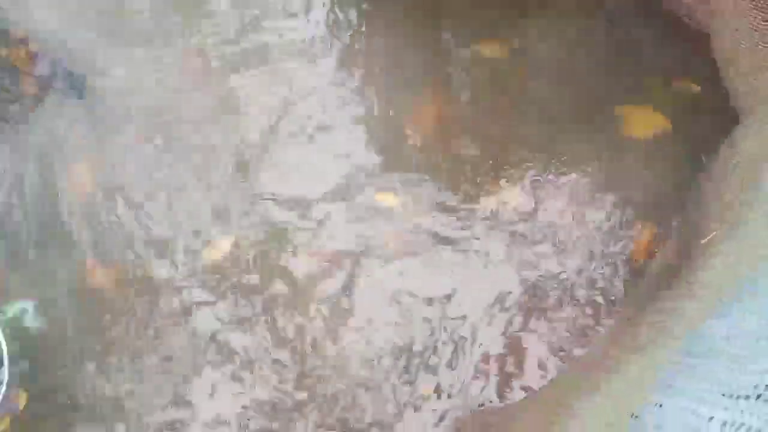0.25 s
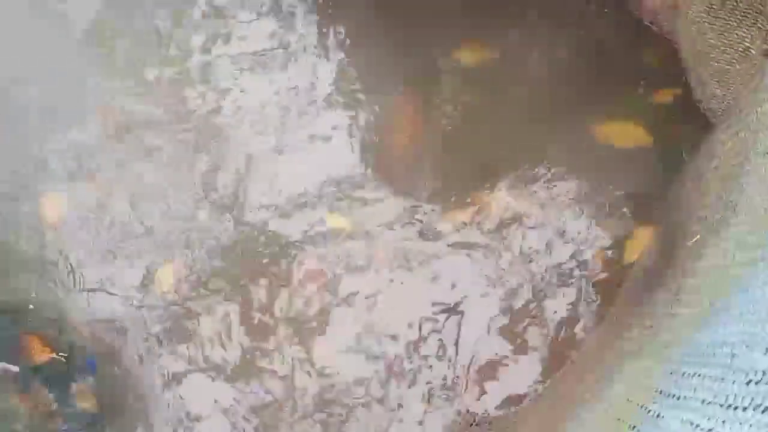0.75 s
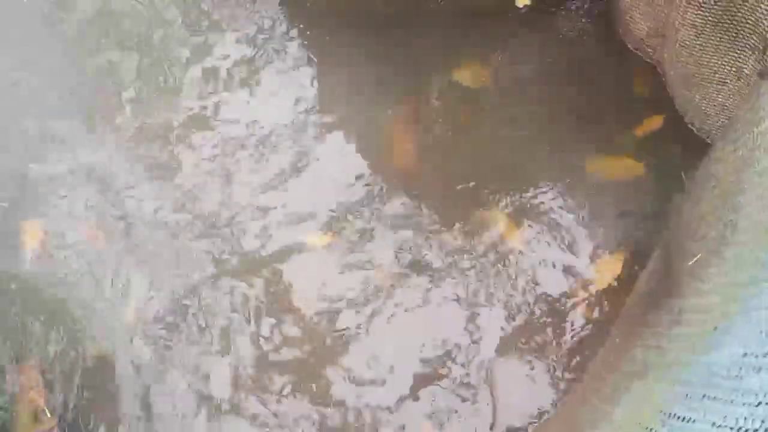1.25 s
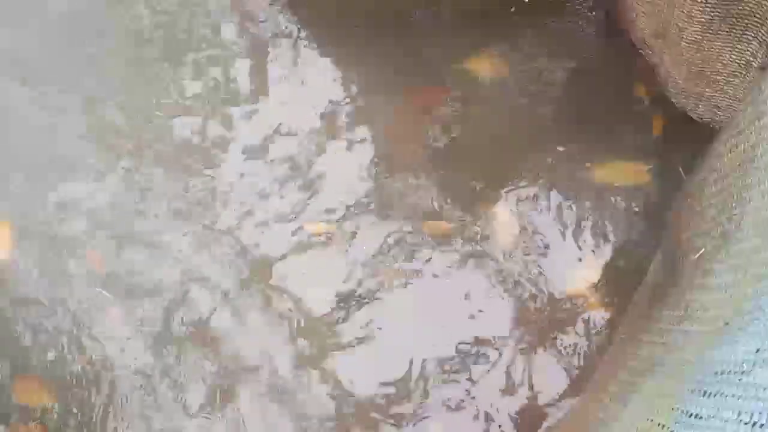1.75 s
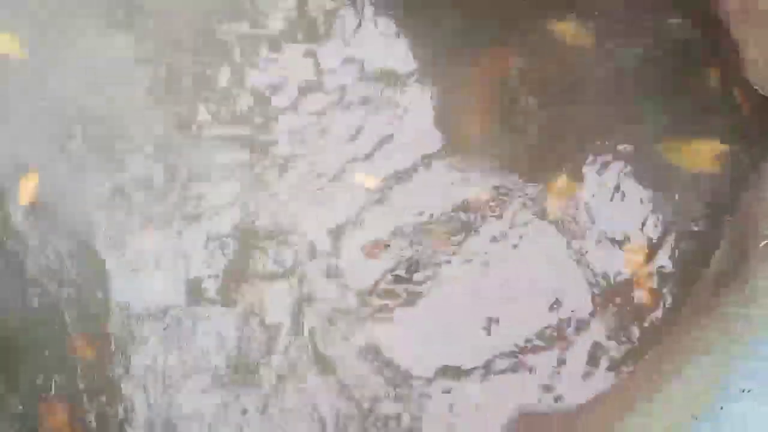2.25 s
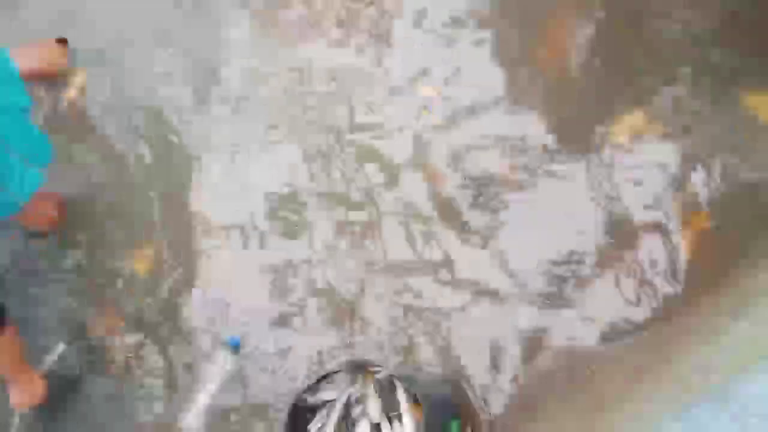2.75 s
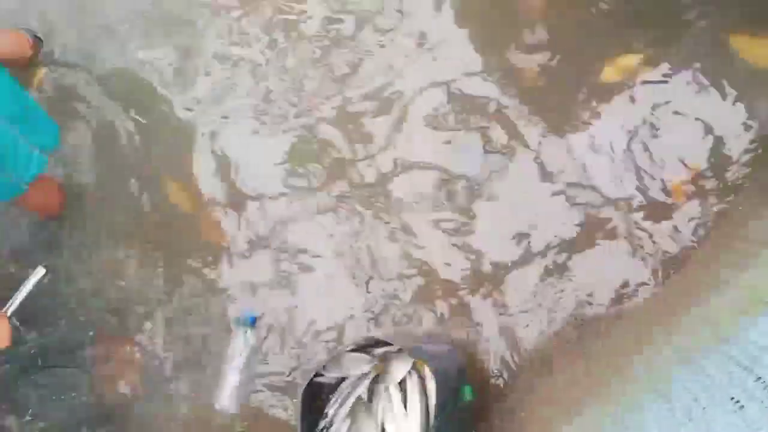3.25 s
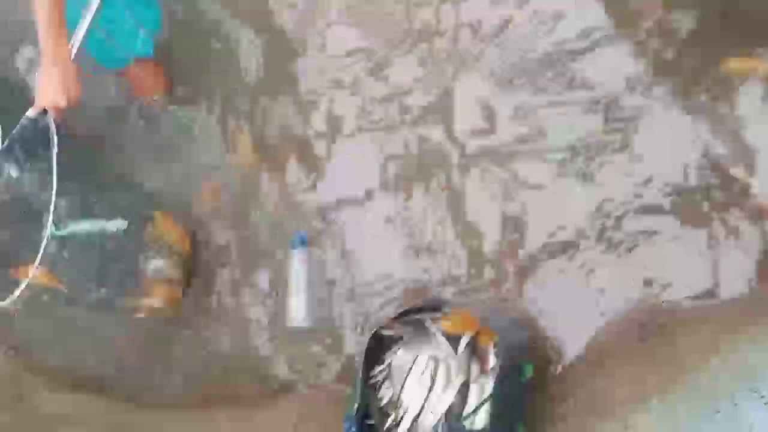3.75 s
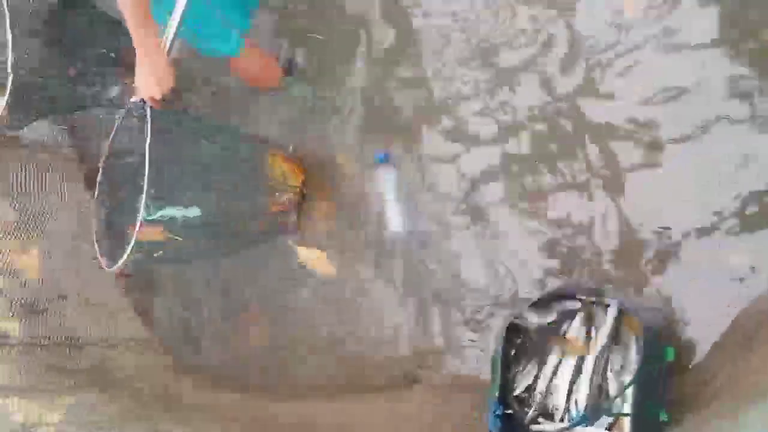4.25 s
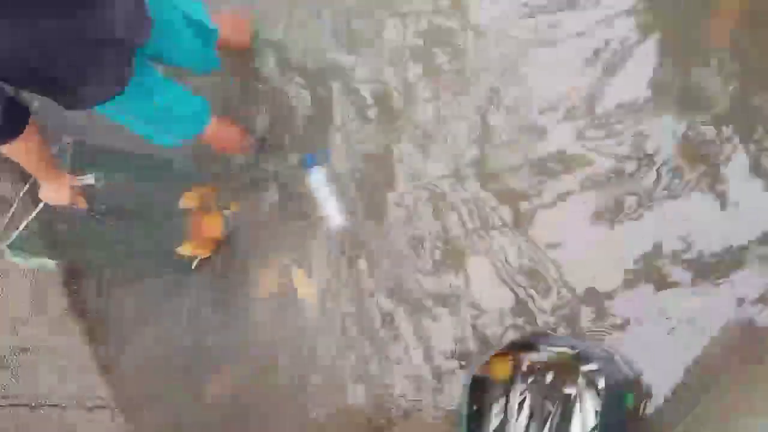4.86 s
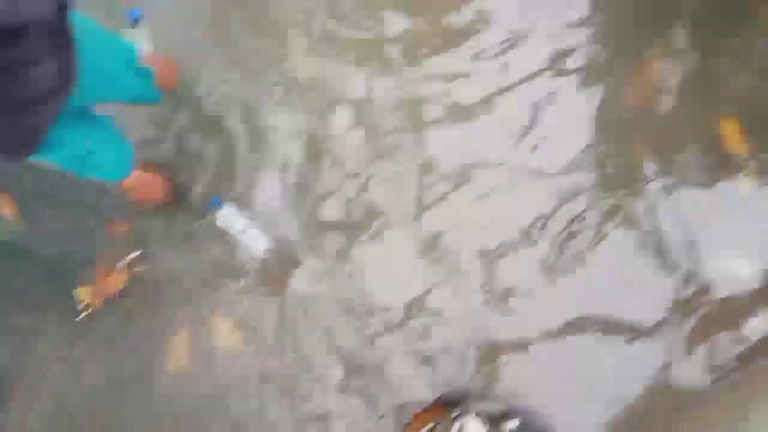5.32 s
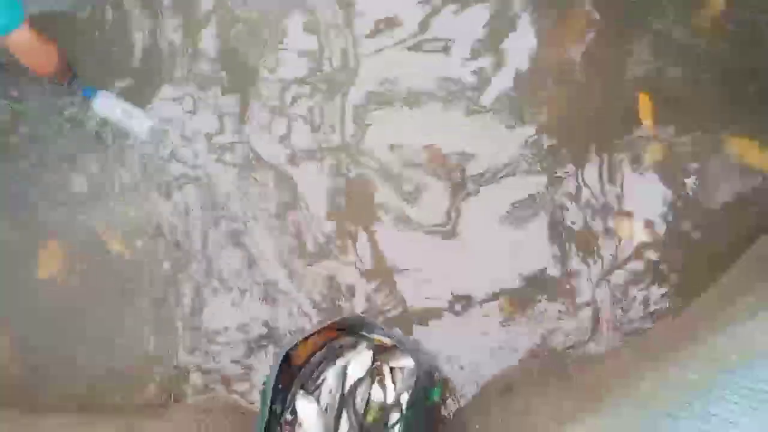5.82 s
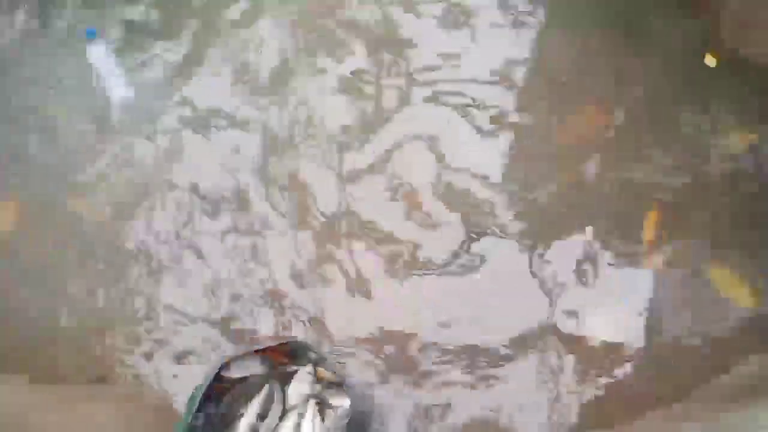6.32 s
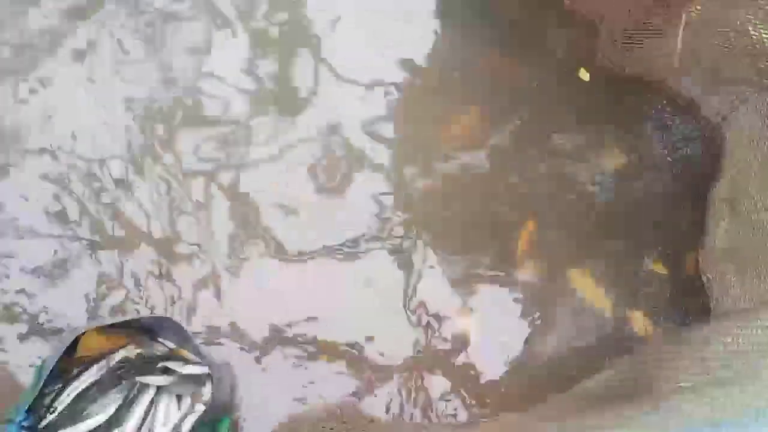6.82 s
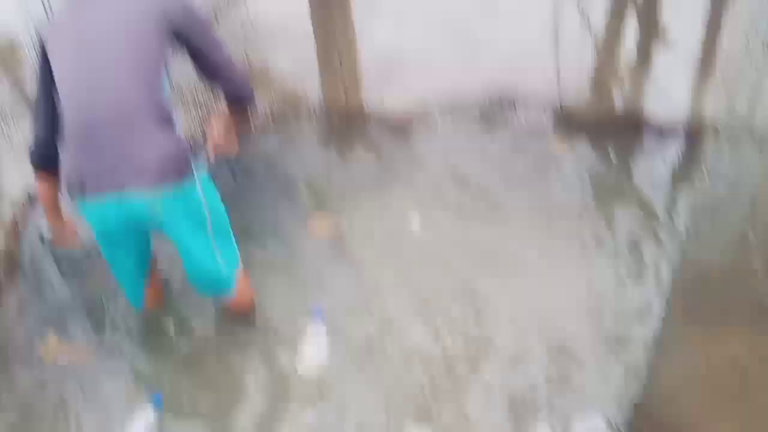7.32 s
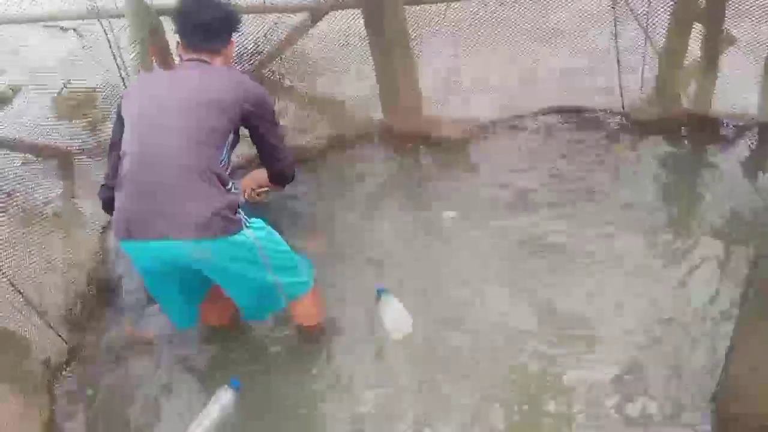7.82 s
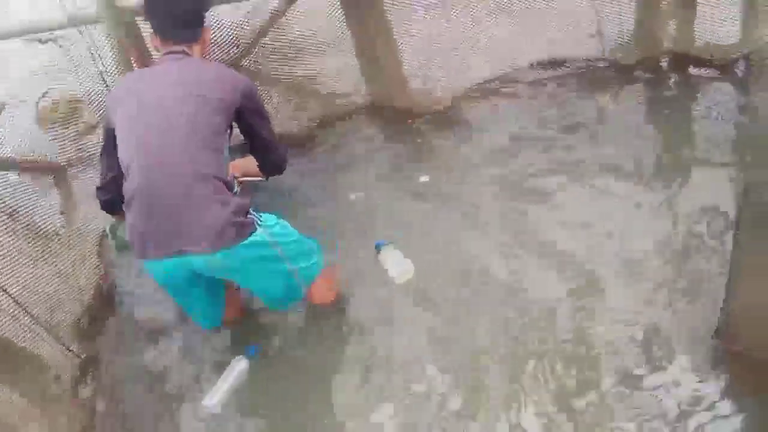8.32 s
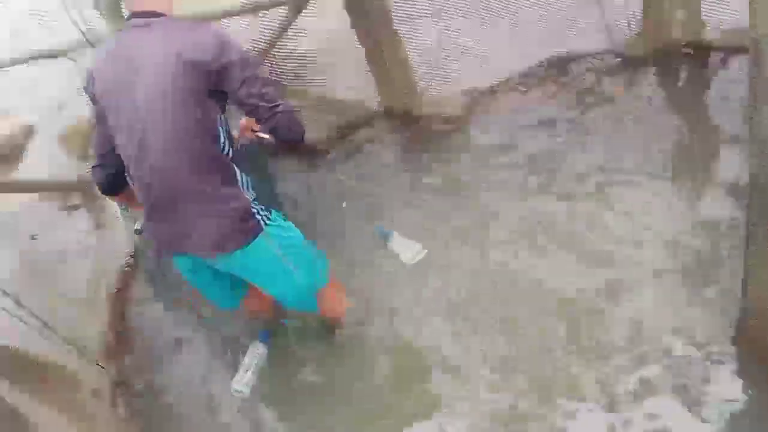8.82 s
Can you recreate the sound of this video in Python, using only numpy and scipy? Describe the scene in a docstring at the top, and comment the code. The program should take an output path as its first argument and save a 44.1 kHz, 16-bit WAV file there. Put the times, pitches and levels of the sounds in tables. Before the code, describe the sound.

Irregular low hollow knocks and wet smacks of a flapping catch, crisp spray ticks, soft sloshing and dripping in shallow water outdoors.

```python
"""Shallow water outdoors: fish are scooped with a hand net from a trap.
Close by, the catch flaps in a plastic bucket: decaying low tones knock on its wall, and bursts of
coloured noise make the wet slaps and sharp flicks of spray. Behind, the net and wading legs stir the water:
patters of noise and tiny rings slosh, splash and drain. Short rings add gulps of air and higher bucket
knocks. Quiet air lies under it all."""
import sys
import numpy as np
from scipy import signal
from scipy.fft import rfft, irfft, next_fast_len
from scipy.io import wavfile
from scipy.ndimage import uniform_filter1d, map_coordinates

SR = 44100
rng = np.random.default_rng(int(sys.argv[2]) if len(sys.argv) > 2 else 0)


def generate_wav(sig):
    """Save sig (samples, or channels by samples) to the path in sys.argv[1] as 16-bit PCM at SR."""
    pcm = np.round(np.clip(np.atleast_2d(sig).T, -1, 1) * 32767).astype(np.int16)
    wavfile.write(sys.argv[1], SR, pcm)


N = 400428  # length [samples]

# Event levels are cues for the mix: each source trims them further.
# Tail beats on the bucket wall: (time [s], level [dB], nominal pitch [Hz])
TAIL_BEATS = [(0.098, -21.5, 217), (.117, -26, 178), (0.271, -29, 249), (0.564, -31.5, 259),
              (0.623, -25, 251), (0.656, -21, 264), (0.701, -25.5, 250), (.736, -24.5, 290),
              (1.113, -23.5, 274), (1.193, -25.5, 268), (1.224, -26, 250), (1.473, -25.5, 275),
              (1.717, -32.5, 246), (1.777, -31, 242), (1.916, -24, 269), (2.419, -31, 244),
              (2.534, -21, 275.6), (2.706, -26.5, 276), (2.737, -26.5, 261), (2.806, -27, 258),
              (3.064, -28.5, 263), (3.088, -38.5, 286), (3.194, -20, 247), (3.297, -32, 243),
              (3.498, -8.5, 270.5), (3.507, -16.5, 264), (3.534, -39, 286), (3.592, -25, 258),
              (3.785, -28.5, 262), (3.811, -25, 235), (4.009, -14, 254), (4.035, -24, 303),
              (4.252, -18, 244), (4.275, -19.5, 262), (4.322, -19.5, 258), (4.355, -21.5, 257),
              (4.487, -22, 286), (4.517, -25, 295), (4.648, -11.5, 279), (4.714, -17, 272),
              (4.867, -20.5, 280), (4.912, -10.5, 252), (4.923, -18, 182), (5.433, -36, 280),
              (5.835, -51.5, 267), (6.068, -32.5, 330), (6.256, -17.5, 295), (6.336, -23, 258),
              (6.747, -16.5, 284), (6.831, -20, 284), (7.199, -18, 295), (7.205, -29, 288),
              (7.342, -13.5, 254), (7.384, -9, 263), (7.4, -9, 242), (7.636, -25.5, 260),
              (7.678, -14.5, 287), (7.777, -26, 273), (7.922, -14, 265), (8.058, -6.5, 269),
              (8.215, -14, 321), (8.272, -19.5, 239), (8.302, -19, 280), (8.367, -15, 280),
              (8.427, -15, 273), (8.68, -16, 271), (8.737, -21.5, 272), (8.762, -31, 267),
              (8.843, -27.5, 264), (8.973, -25, 284), (9.037, -24.5, 263), (9.071, -22, 282)]
# Wet slaps of fish on fish: (time [s], level [dB], spray relative to the slap [dB])
WET_SLAPS = [(0.254, -36.5, -32), (.626, -32.5, -17), (0.736, -22, -28), (1.144, -33, 9),
             (1.192, -25.5, -21), (1.4703, -21, -17), (1.792, -29.5, -15), (2.057, -20, -11),
             (2.418, -21, -5.5), (2.61, -17, -14), (2.709, -16.5, -8.5), (2.78, -23, 1), (2.536, -31.5, 6),
             (3.127, -32.5, -6), (4.004, -25, 10), (4.254, -21.5, -2), (4.647, -15, -17), (4.787, -22, -18),
             (4.867, -13, -4), (5.6292, -49, 35), (5.7373, -25.5, -2), (5.762, -34, 20), (5.855, -25, -9),
             (6.389, -36.5, -15), (6.332, -30.5, 6.5), (6.75, -36, 7), (6.836, -28, -11),
             (7.2597, -35.5, 9), (7.283, -28.5, -12), (7.371, -31, 5.5), (7.389, -31, -25),
             (7.429, -27.5, 0), (7.6385, -23, -4), (7.68, -13.5, -33), (7.9225, -20, -15),
             (8.218, -11, 0.5), (8.273, -19.5, -22), (8.3014, -24, 0.5), (8.3686, -20.5, 0),
             (8.428, -30.5, 8)]
# Flicks of spray: (time [s], level [dB])
SPRAY_FLICKS = [(0.0746, -11), (0.1229, -21.5), (.172, -24), (0.3048, -23.5), (0.482, -26), (0.61, -20.5),
                (0.676, -18.5), (0.8602, -16.5), (1.089, -22.5), (1.1456, -20.5), (1.4432, -26),
                (1.884, -28.5), (1.9138, -20), (2.3098, -17.5), (2.3664, -20), (2.487, -15), (2.648, -23),
                (2.816, -15), (2.936, -29), (3.015, -14.5), (3.1444, -21), (3.2012, -21), (3.3382, -18.5),
                (3.7666, -13), (3.8123, -17.5), (4.128, -19.5), (4.5464, -22), (4.815, -15.5), (5.477, -28),
                (5.0689, -14.5), (6.1173, -24), (6.223, -36), (6.257, -21), (6.291, -27.5), (6.406, -29.5),
                (6.835, -15), (6.9064, -19), (6.916, -15.5), (7.5379, -23), (7.7394, -19.5), (7.836, -12.5),
                (8.054, -25), (8.1201, -15.5), (8.158, -22), (8.191, -17), (8.537, -18.5), (8.9747, -17.5)]
# Short rings, gliding gulps of air and higher rings of the knocked bucket wall:
# (time [s], level [dB], starting pitch [Hz], life [s], glide over one life [octaves])
SHORT_RINGS = [(.244, -35.5, 1615, 0.019, 0.18), (.43, -40.5, 617, 0.063, 0.43),
               (1.143, -23, 3480, 0.0076, -0.087), (1.21, -30.5, 670, 0.014, 0.12),
               (2.11, -31, 667, 0.023, 0.028), (3.385, -41, 523, 0.1, 0.67), (3.442, -30, 1546, .02, -0.08),
               (3.496, -24.5, 584, 0.026, -0.14), (3.885, -34, 489, 0.042, 0.64),
               (3.922, -36, 880, 0.043, 0.22), (4.11, -41, 1400, 0.067, 0.0058),
               (4.421, -33, 849, 0.065, 0.41), (5.69, -41, 759, 0.079, -0.19),
               (5.761, -31, 900, 0.0089, .1), (5.79, -29.5, 703, 0.024, -0.15),
               (5.83, -34.5, 655, 0.027, 0), (5.965, -30.5, 4260, 0.0063, 0.23),
               (6.067, -35, 602, 0.0084, 0.35)]
# Strokes of the net and legs through the water:
# (time [s], length [s], slosh level [dB], draining drops level [dB])
WATER_STROKES = [(0.0, 0.22, -51, -48.5), (0.283, 0.094, -41.5, -38), (0.531, 0.39, -48, -47.5),
                 (0.837, 0.053, -40, -36), (0.979, 0.22, -46.5, -46), (1.411, 0.11, -45.5, -44),
                 (1.707, 0.079, -57.5, -42), (1.903, 0.17, -51, -51), (2.249, 0.53, -52.5, -49),
                 (2.701, 0.027, -38, -35.5), (2.921, 0.065, -41, -34), (3.13, 0.29, -60, -48),
                 (3.346, 0.13, -40, -41), (3.48, 0.24, -47.5, -46), (3.73, 0.19, -46, -41.5),
                 (3.938, 0.36, -40.5, -37), (4.332, 0.19, -41.5, -41.5), (4.612, 0.21, -40.5, -36),
                 (5.057, 0.054, -53, -40.5), (5.303, 0.34, -59.5, -48.5), (5.394, 0.016, -44, -35.5),
                 (5.618, 0.24, -42.5, -38), (6.176, 0.19, -57.5, -49.5), (6.739, 0.17, -50, -46.5),
                 (6.992, 0.18, -66, -56.5), (7.257, 0.11, -45.5, -46.5), (7.53, 0.1, -59.5, -45),
                 (7.718, 0.2, -45.5, -39), (8.043, 0.11, -41.5, -42.5), (8.179, 0.062, -34.5, -36),
                 (8.343, 0.24, -53, -47.5), (8.636, 0.2, -44.5, -41.5), (8.938, 0.19, -40.5, -34.5)]
# Thrown water crashing back: (time [s], length [s], level [dB])
CRASHES = [(0.331, 0.012, -39), (2.799, 0.042, -32), (4.374, 0.11, -41.5), (5.623, 0.025, -30),
           (5.721, 0.14, -33)]

# Colours set only the balance of the spectrum, since each coloured sound is rescaled.
# Low body of the bucket wall: (frequency [Hz], level [dB])
WALL_COLOUR = [(30, -17), (70, -19.5), (105, -7.5), (150, -16.5), (200, 6), (260, 10), (350, -1.5),
               (470, -41), (900, -92)]
# Higher modes of the bucket wall: (frequency [Hz], level [dB])
UPPER_WALL_COLOUR = [(300, -49), (480, -11.5), (640, 17), (800, -3), (1050, -12.5), (1400, 9), (2500, -17)]
# Wet skin clapping: (frequency [Hz], level [dB])
SLAP_COLOUR = [(200, -51), (500, -12.5), (700, 2.5), (900, -4.5), (1400, 7), (2100, 8), (3000, -1.5),
               (4000, 3.5), (5200, -16), (12000, -99)]
# Flying spray and single drops: (frequency [Hz], level [dB])
SPRAY_COLOUR = [(300, -27), (1000, -40), (2000, -13.5), (4000, -3.5), (5200, -10), (6500, -1), (7800, 6.5),
                (10000, 0), (12500, -3.5), (15000, 2.5)]
# Foam of the slosh: (frequency [Hz], level [dB])
SLOSH_COLOUR = [(60, 2), (480, -26), (700, -7), (950, -20), (1500, 13), (2200, 11.5), (2800, 8.5),
                (4000, 10.5), (5200, -2.5), (9000, -11)]
# Water running off the mesh: (frequency [Hz], level [dB])
DRAIN_COLOUR = [(1500, -33), (3500, -1.5), (5200, -9.5), (6500, -3), (7800, 5), (9500, -5.5), (12500, -5.5),
                (15000, -8.5)]
# Outdoor air: (frequency [Hz], level [dB])
AIR_COLOUR = [(25, -17), (60, 21.5), (200, 29), (500, -11), (1000, -1.5), (3000, 2.5), (5300, -33),
              (6800, 4.5), (7900, 25), (9500, -17), (15000, -37)]
# Sheet of water breaking: (frequency [Hz], level [dB])
SHEET_COLOUR = [(500, -23), (1400, 3.5), (2700, -1), (4400, -2.5), (5500, -9), (7800, -3.5), (13000, -11)]
# Small bubbles under the foam: (frequency [Hz], level [dB])
GURGLE_COLOUR = [(300, -31), (600, 1.5), (1500, 2.5), (4000, 28)]
# Stereo likeness: (frequency [Hz], left-right correlation [-1 to 1])
LIKENESS = [(200, 0.96), (500, 0.86), (1000, -0.59), (2000, 0.38), (4000, -0.012)]
# Stereo balance: (frequency [Hz], left over right [dB])
BALANCE = [(250, 1), (4500, 0.5), (8000, -6.5), (12000, -1.5)]

RISE_S = 0.023  # a stroke gathers speed
SETTLE_T60, DRAIN_T60 = 0.39, 0.36  # [s] the slosh settles and the mesh runs dry after it
LAPPING_DB, DRIPPING_DB = -101.5, -64.5  # what is left of both between strokes, before trims
UNEVEN_DB, UNEVEN_RATE = 1.5, 21.95  # the water moves unevenly: spread [dB], random points a second
TOP_HZ = 15750  # middle of the upper band edge


def amp(db):
    """Decibels to gain."""
    return 10 ** (np.asarray(db) / 20)


def unit(x):
    """Scale to rms 1."""
    return x / np.sqrt(np.mean(x ** 2) + 1e-20)


def along(points, hz):
    """Read a (frequency, value) table on a log frequency axis."""
    f, value = np.transpose(points)
    return np.interp(np.log(hz + 1), np.log(f + 1), value)


def filtered(x, response):
    """Shape the spectrum of x by a response of frequency."""
    n = x.shape[-1]
    padded = next_fast_len(n + 4096)
    spectrum = rfft(x, padded) * response(np.fft.rfftfreq(padded, 1 / SR))
    return irfft(spectrum, padded)[..., :n]


def panned(db):
    """Left and right gains for a left-right difference, at constant power."""
    gains = amp(np.array([db, -db]).reshape(2, -1) / 2)
    return gains / np.sqrt(np.mean(gains ** 2, axis=0))


def voiced(pair, colour):
    """Two unrelated signals become coloured left and right of rms 1, alike in the bass."""
    def mid_side_gains(hz):
        turn = np.arccos(np.clip(along(LIKENESS, hz), -1, 1)) / 2
        return amp(along(colour, hz)) * [np.cos(turn), np.sin(turn)]

    mid, side = filtered(pair, mid_side_gains)
    left_right = np.array([mid + side, mid - side])
    return unit(filtered(left_right, lambda hz: panned(along(BALANCE, hz))))


def noise(colour):
    """Coloured stereo noise of rms 1."""
    return voiced(rng.standard_normal((2, N)), colour)


def wet_noise(colour, patchy_db=4.8):
    """Noise with passing resonances: small cavities in the water open and close all the time."""
    z = signal.stft(rng.standard_normal((2, N)), nperseg=512)[2]
    field = rng.standard_normal(z.shape[1:])
    field = uniform_filter1d(field, size=3, axis=0)  # blurred across frequency
    field = uniform_filter1d(field, size=6)  # and across time
    patchy = signal.istft(z * amp(patchy_db * unit(field)))[1][:, :N]
    return voiced(patchy, colour)


def excited(force, colour):
    """A rough force of the given rms envelope rings a body of the given colour."""
    return np.sqrt(np.mean(force ** 2)) * voiced(force * rng.standard_normal((2, N)), colour)


def wobble(rate):
    """A smooth curve through random points, rate of them a second."""
    points = rng.standard_normal(int(N * rate / SR) + 4)
    return map_coordinates(points, [np.arange(N) * rate / SR])


def fade(t, t60):
    """Exponential decay by 60 dB in t60 seconds."""
    return np.exp(-np.log(1000) * t / t60)


def onset(t, rise_s):
    """A rise from silence towards full level, with time constant rise_s."""
    return -np.expm1(-t / rise_s)


def swell(t, peak_s):
    """A soft push that reaches 1 at peak_s and dies away."""
    return (t / peak_s * np.exp(1 - t / peak_s)) ** 2


def add(track, start_s, sound):
    """Mix a sound into a track at start_s."""
    start = max(0, round(start_s * SR))
    part = track[..., start:start + sound.shape[-1]]
    part += sound[..., :part.shape[-1]]


def patter(rate, t60):
    """Envelope of rms 1 of many tiny impacts, rate of them a second, a few much larger than the rest."""
    chance = rng.random(N)
    size = np.minimum(rng.exponential(size=N), 4)
    power = (chance < rate / SR) * size ** 2
    return unit(np.sqrt(signal.lfilter([1], [1, -fade(1 / SR, t60) ** 2], power)))


def air():
    """Quiet outdoor air is a steady coloured noise."""
    return amp(-61.5) * noise(AIR_COLOUR)


def surroundings(x, t60=0.06):
    """A short scatter from the bank and the water surface, drawn anew for every block."""
    t = np.arange(SR // 8) / SR
    out = np.zeros((2, N))
    for start in range(0, N, len(t)):
        tail = rng.standard_normal((2, len(t))) * fade(t, t60) * onset(t, 0.00087)
        tail = voiced(tail, [(280, -7), (600, 0)]) / np.sqrt(len(t))
        block = x[:, start:start + len(t)]
        add(out, start / SR, signal.fftconvolve(block, tail, axes=1))
    return out


def flow():
    """Levels [dB] of slosh and draining drops: each stroke rises, holds and dies away."""
    t = np.arange(SR) / SR
    slosh, drops = np.full(N, amp(LAPPING_DB) ** 2), np.full(N, amp(DRIPPING_DB) ** 2)  # powers
    for start_s, length, slosh_db, drops_db in WATER_STROKES:
        rise = np.minimum(t / RISE_S, 1)
        after = np.maximum(t - length, 0)
        add(slosh, start_s, (amp(slosh_db) * rise * fade(after, SETTLE_T60)) ** 2)
        add(drops, start_s, (amp(drops_db) * rise * fade(after, DRAIN_T60)) ** 2)
    return 10 * np.log10([slosh, drops]) + UNEVEN_DB * wobble(UNEVEN_RATE)


def fizz(count, centre_hz, octaves, cycles):
    """Small bubbles, each a short damped ring, at random places: a pair of rms 1."""
    t = np.arange(SR // 80) / SR
    place = rng.random((count, 1))
    size = np.minimum(rng.exponential(size=(count, 1)), 2.5)
    hz = np.minimum(centre_hz * 2 ** (octaves * rng.standard_normal((count, 1))), SR / 4)
    age = t * hz / cycles
    envelope = (1 - np.exp(-10 * age)) * np.exp(-age) * (1 - t / t[-1])
    rings = size * envelope * np.sin(2 * np.pi * hz * t)
    index = ((place * N).astype(int) + np.arange(len(t))).ravel()
    bearing = 2 * np.pi * rng.random((count, 1))
    pair = [np.bincount(index, (rings * gain).ravel(), N)[:N] for gain in (np.cos(bearing), np.sin(bearing))]
    return unit(np.array(pair))


def water(slosh_db=-3, gurgle_db=-6, drain_db=0):
    """Sloshing is a dense foam wash over a gurgle of small bubbles; the mesh drains in a fine patter."""
    stir_db, drops_db = flow()
    foam = amp(slosh_db) * patter(rate=1500, t60=.05) * wet_noise(SLOSH_COLOUR)
    rings = fizz(count=11000, centre_hz=1000, octaves=.65, cycles=6)
    gurgle = amp(gurgle_db) * voiced(rings, GURGLE_COLOUR)
    drain = amp(drops_db + drain_db) * patter(rate=730, t60=0.061) * wet_noise(DRAIN_COLOUR)
    return amp(stir_db) * (foam + gurgle) + drain


def drips(drip_db=-6):
    """Single drops fall from the wet mesh and tick on the water."""
    return amp(flow()[1] + drip_db) * patter(rate=45, t60=.022) * wet_noise(SPRAY_COLOUR)


def splashes(rise_s=0.0049, fall_t60=0.12):
    """A sheet of water breaks on the surface: a full, ragged burst that thins out quickly."""
    t = np.arange(SR // 2) / SR
    crash = np.zeros(N)
    for start_s, length, db in CRASHES:
        fall = fade(np.maximum(t - length, 0), fall_t60)
        add(crash, start_s, amp(db) * onset(t, rise_s) * fall)
    return crash * patter(rate=2500, t60=.02) * wet_noise(SHEET_COLOUR)


def short_rings(ring_db=-3):
    """Short rings of blurred pitch: gliding gulps of air, and higher rings of the knocked bucket wall."""
    t = np.arange(SR // 4) / SR
    track = np.zeros(N, complex)
    for start_s, db, hz, life, glide in SHORT_RINGS:
        pitch = hz * 2 ** (glide * np.minimum(t / life, 2))  # the glide stops after two lives
        ring = np.exp(2j * np.pi * np.cumsum(pitch) / SR)
        add(track, start_s, amp(db + ring_db) * swell(t, life / 3) * ring)
    shimmer = .6 + .55 * (wobble(240) + 1j * wobble(240))  # unsteady level and phase
    return (track * shimmer).imag


def jostle(wall_db=-10.5, upper_db=-22, rest_db=-67):
    """After each blow the restless fish nudge the bucket softly; they never lie quite still."""
    t = np.arange(SR // 2) / SR
    unrest = np.zeros(N)
    for start_s, db, _ in TAIL_BEATS:
        add(unrest, start_s, amp(db) * swell(t, .02))
    restless = np.sqrt(unrest + amp(rest_db))  # the root halves every level in dB
    nudges = restless * amp(-20) * patter(rate=120, t60=.08)
    return excited(amp(wall_db) * nudges, WALL_COLOUR) + excited(amp(upper_db) * nudges, UPPER_WALL_COLOUR)


def flicks(snap_db=-5, lead_db=-32, scatter_db=-24):
    """A sharp tick of spray, a short burst and scattering droplets, after a faint soft lead-in."""
    t = np.arange(SR // 4) / SR
    rise = onset(t, .0005)
    lead = amp(lead_db) * swell(t, .005)  # faint soft lead-in
    crack = 1.4 * swell(t, .0005) + amp(-10) * rise * fade(t, .035)  # tick and burst
    scatter = amp(scatter_db) * rise * fade(t, .16)
    snap, droplets = np.zeros((2, N))
    for start_s, db in SPRAY_FLICKS:
        gain = amp(db + snap_db)
        add(droplets, start_s - .005, gain * lead)
        add(snap, start_s, gain * crack)
        add(droplets, start_s, gain * scatter)
    return (snap + droplets * patter(rate=110, t60=0.083)) * wet_noise(SPRAY_COLOUR)


def slaps(hit_db=-6, spray_db=-2, shake_db=-15):
    """Wet skin claps shut, then squelches as water is pressed out; spray flies and the pile shakes the bucket."""
    t = np.arange(SR // 4) / SR
    squelch = onset(t, 0.0038) * fade(t, 0.1)
    stroke = .8 * swell(t, .0028) + amp(-12) * squelch
    clap, spray, shake = np.zeros((3, N))
    for start_s, db, wet_db in WET_SLAPS:
        add(clap, start_s, amp(db + hit_db) * stroke)
        add(spray, start_s, amp(db + hit_db + wet_db + spray_db) * stroke)
        add(shake, start_s, amp(db + shake_db) * squelch)
    wet = clap * wet_noise(SLAP_COLOUR) + spray * wet_noise(SPRAY_COLOUR)
    return wet + excited(shake, WALL_COLOUR)


def knocks(peak_s=0.006, ring_db=-2.5, second_db=-14, second_ratio=1.25,
           tail_db=-21, tail_t60=0.13, upper_db=-35, upper_t60=0.042):
    """A tail shoves the damped wall for a few cycles, its pitch settling; a second mode varies with the place."""
    t = np.arange(SR // 4) / SR
    settle = np.exp(-t / .01) - .5
    ring, shudder, upper = np.zeros((3, N))
    variations = rng.uniform(-1, 1, (len(TAIL_BEATS), 3))
    for (start_s, db, hz), (length, sag, place) in zip(TAIL_BEATS, variations):
        push = swell(t, peak_s * amp(2 * length))  # shorter or longer by up to a quarter
        pitch = hz * (1 + (.07 + .09 * sag) * settle)  # mostly sags, now and then rises slightly
        phase = 2 * np.pi * np.cumsum(pitch) / SR
        second = 2 * place * amp(second_db) * swell(t, peak_s) * np.sin(second_ratio * phase)
        add(ring, start_s, amp(db + ring_db) * (push * np.sin(phase) + second))
        add(shudder, start_s, amp(db + tail_db) * onset(t, 0.0012) * fade(t, tail_t60))
        # the upper wall follows the force of the blow only half as far in dB
        add(upper, start_s, amp(db / 2 + upper_db) * onset(t, 0.0074) * fade(t, upper_t60))
    return ring + excited(shudder, WALL_COLOUR) + excited(upper, UPPER_WALL_COLOUR)


def scene():
    """The bucket and short rings in front with their scatter, the stirred water behind, over quiet air."""
    near = knocks() + slaps() + flicks() + short_rings() + jostle()
    behind = water() + splashes() + drips()
    return near + amp(-4.0) * surroundings(near) + behind + air()


def record(dry, low_hz=50):
    """The deepest bass is thinned out; the recorder keeps nothing above its band limit."""
    thin = filtered(dry, lambda hz: (hz / np.hypot(hz, low_hz)) ** 2)
    return filtered(thin, lambda hz: np.clip((TOP_HZ - hz) / 300 + .5, 0, 1))  # edge 300 Hz wide


dry = scene()
out = record(dry)
generate_wav(out)
```